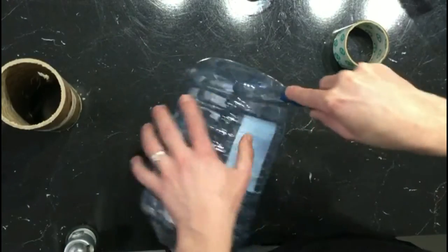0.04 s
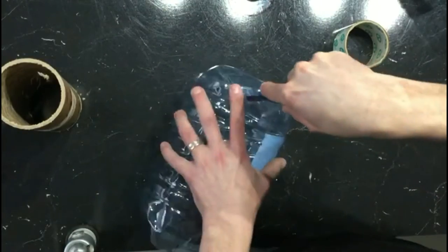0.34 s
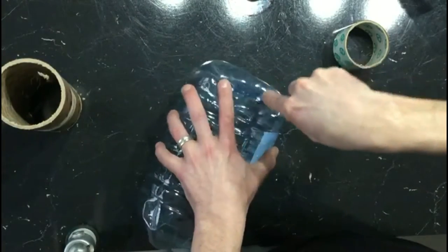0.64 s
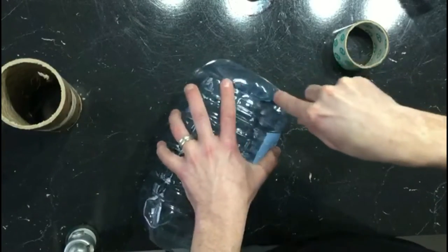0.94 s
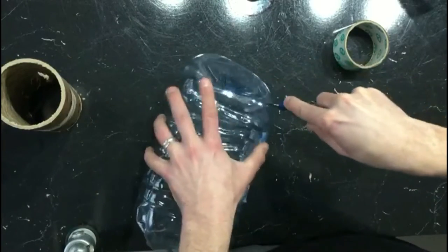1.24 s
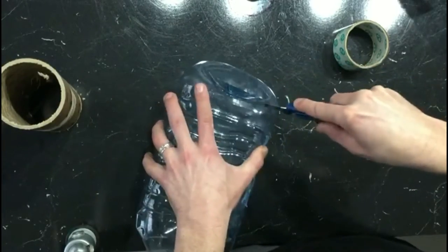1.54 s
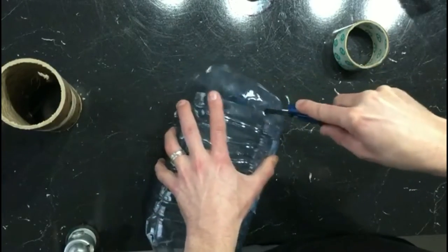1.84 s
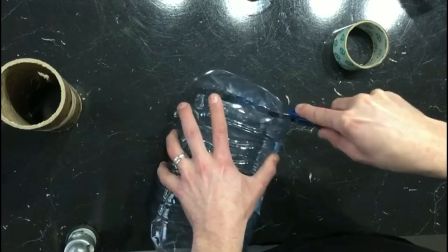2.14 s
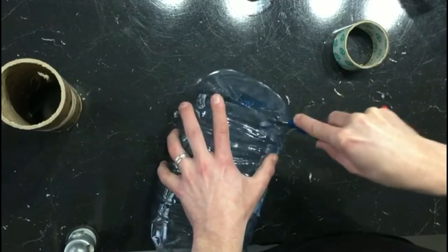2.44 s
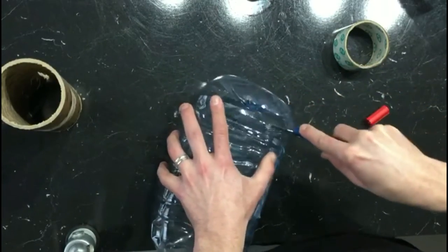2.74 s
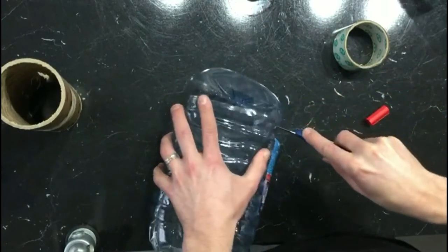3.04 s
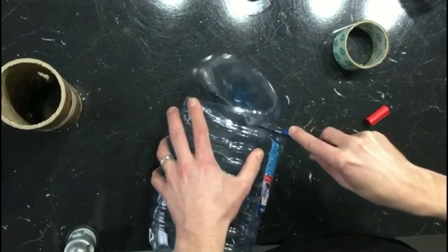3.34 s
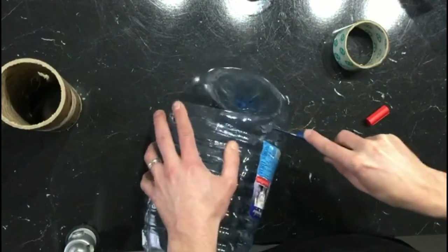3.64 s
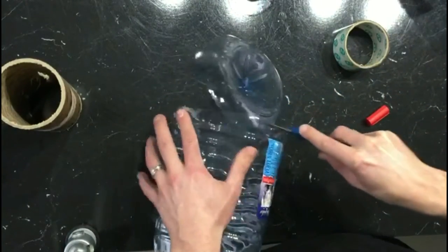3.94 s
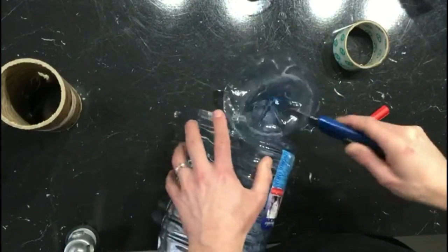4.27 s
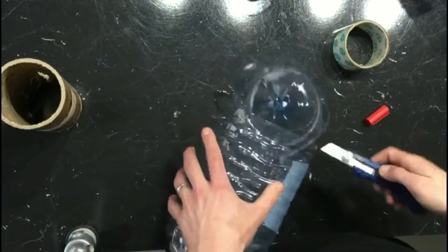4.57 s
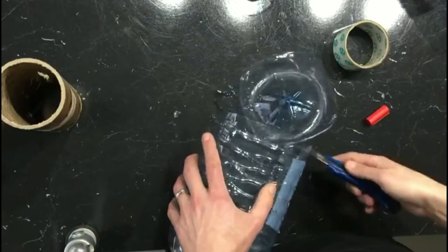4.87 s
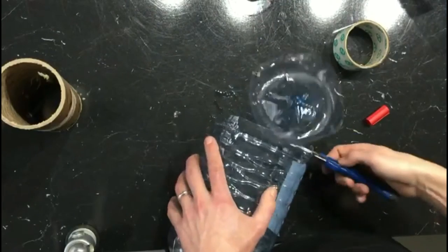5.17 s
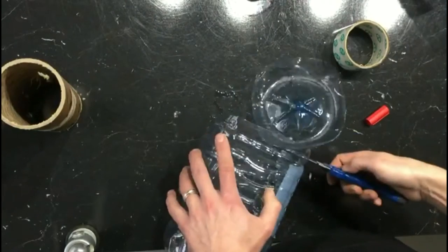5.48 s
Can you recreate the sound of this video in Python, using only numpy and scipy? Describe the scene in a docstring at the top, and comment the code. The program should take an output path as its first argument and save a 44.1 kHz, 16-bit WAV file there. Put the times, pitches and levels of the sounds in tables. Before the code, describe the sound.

A thin plastic bottle crinkles and pops as a utility knife cuts it in short rasping strokes, over a faint hum.

```python
"""Cutting open a plastic bottle

A thin plastic water bottle is held on a table and cut open with a utility knife.
The blade sticks and slips in short rasping strokes and squeaks twice. The wall crinkles under
the hand and buckles in sharp pops, and big flexes leave the bottle ringing like a drum.
A bare room echoes the rasps, crinkles, pops and squeaks, over a faint hum."""
import sys
import numpy as np
from scipy import signal
from scipy.fft import rfft, irfft, next_fast_len
from scipy.io import wavfile
from scipy.ndimage import map_coordinates

SR = 44100
rng = np.random.default_rng(int(sys.argv[2]) if len(sys.argv) > 2 else 0)


def bounce(signal):
    """Save signal as a 16-bit WAV file at the path given by the first command-line argument."""
    frames = np.transpose(np.atleast_2d(signal))
    limited = np.clip(frames, -1, 1)
    pcm = np.round(limited * 32767).astype(np.int16)
    wavfile.write(sys.argv[1], SR, pcm)


N = 251811

# The blade rasps or the bottle rubs. A panel is one patch of the bottle's wall.
# (start [s], end [s], panel pitch [Hz], panel level [dB], rasp level [dB])
STROKES = [(0, 0.075, 324, -30, -35), (.11, 0.2, 262, -40.5, -61), (.266, 0.307, 395, -40, -39),
           (.447, 0.514, 356, -33.5, -39.5), (.651, 0.709, 295, -40, -33), (.736, 0.783, 324, -46, -40.5),
           (1.858, 1.91, 450, -41, -41.5), (1.901, 1.925, 396, -24.5, -32),
           (2.087, 2.222, 343, -48.5, -48.5), (2.321, 2.443, 443, -41, -47.5),
           (2.517, 2.533, 556, -52, -39), (3.401, 3.445, 382, -33, -48), (3.576, 3.673, 445, -42.5, -47.5),
           (3.79, 3.817, 370, -37, -48), (4.083, 4.19, 282, -37.5, -47), (4.375, 4.43, 380, -48, -52),
           (4.52, 4.59, 256, -44, -60), (5.168, 5.206, 410, -48.5, -45), (5.25, 5.28, 470, -29.5, -31),
           (5.487, 5.517, 423, -46.5, -55)]
# Bands in which the blade makes the wall ring (low [Hz], high [Hz])
RASP_BANDS = [(620, 1040), (1700, 2370), (2500, 4290), (5000, 9830)]
# How each of them answers; pressing harder sounds brighter
# (level in a medium stroke [dB], growth [dB per dB of force])
RASP_RESPONSE = [(0, 0.87), (0, 1.05), (-1, 1.1536), (-8.5, 1.07)]
# Crinkling under the gripping hand (time [s], level [dB])
GRIP_LEVELS = [(0, -55), (.2, -35.5), (.5, -35.5), (1.0, -39), (1.2, -35), (1.65, -52), (1.85, -32),
               (2.1, -42), (2.4, -37), (2.7, -43), (2.95, -34), (3.3, -46), (3.75, -45), (3.95, -43.5),
               (4.5, -64.5), (5.1, -56), (5.3, -40), (5.7, -54)]
# Tone of the crinkling (frequency [Hz], level [dB])
CRINKLE_TONE = [(100, -25.5), (220, 1), (550, 9.5), (900, -1.5), (2200, -7.5), (5000, -18), (10000, -32.5)]
# Tone of the room's air (frequency [Hz], level [dB])
AIR_TONE = [(20, -17.5), (60, -7), (150, -1.5), (300, -19), (500, -20.5), (1000, -36), (3000, -27),
            (10000, -37)]
# Notes of the hum (pitch [Hz], level [dB])
HUM_NOTES = [(145.3, -58), (403.7, -79.5)]
# The room's echo; a ring time, or t60, is the time to fade by 60 dB (frequency [Hz], ring time [s])
ECHO_TIMES = [(150, 1.59), (300, 0.5), (700, 0.86), (1800, 1.15), (4500, 0.67), (9500, 0.42)]
# Tone of the echo (frequency [Hz], level [dB])
ECHO_TONE = [(100, 5), (230, -1.5), (400, -11.5), (800, -1), (1800, -2), (4000, -2.5), (6000, -1),
             (9000, -3)]
# Resonances of the hollow bottle (pitch [Hz], width [Hz], boost [dB])
BOTTLE_RESONANCES = [(179, 17, 9), (247, 5.3, 2.5), (294, 25.3, 7), (324, 2.9, 2), (395, 65, 0),
                     (457.7, 9.6, 6), (570.6, 8.6, 4), (807, 270, -3), (968, 25, 4.5), (1340, 140, -3),
                     (1100, 11, 5.5), (1380, 40, 5.5), (1592, 33, 0.5), (1491, 15, 7), (1690, 34, 4.5),
                     (1560, 25, 1.5), (1885, 19, 5.5), (2410, 25, 0), (2800, 30, 4.5), (3100, 48, 4.5)]
# The wall buckles
# (time [s], panel pitch [Hz], thump level [dB], snap level [dB], brightness [dB per octave])
BUCKLES = [(.098, 505, -18, -24.5, -2.5), (.109, 445, -23, -43, 5), (.183, 217, -26.5, -40.5, 1),
           (.283, 455, -24, -40, 1), (0.329, 427, -26.5, -34, -2.5), (.404, 383, -30.5, -38.5, -10.5),
           (0.6132, 348, -26, -30.5, -5), (.638, 392, -17.5, -18, 3), (0.698, 308, -42, -38.5, 8.5),
           (.778, 396, -26.5, -28.5, -2), (.869, 461, -40, -28, 2.5), (.932, 366, -15, -21, 1.5),
           (1.078, 360, -26, -25.5, -1), (1.226, 610, -28.5, -35.5, 1.5), (1.382, 680, -30.5, -39, -2),
           (1.453, 404, -35, -41.5, 0), (1.7528, 484, -38, -43, 7.5), (1.79, 510, -26, -34, -6),
           (1.9339, 382, -31, -29.5, 1.5), (2.253, 470, -28.5, -34, 7.5), (2.2951, 450, -30.5, -33, 7.5),
           (2.376, 560, -42, -32.5, -6), (2.529, 332, -18, -14.5, -1.24), (2.79, 355, -25, -36.5, 0.5),
           (2.824, 347, -29, -35.5, -2.5), (2.856, 373, -33, -34, 4), (2.9017, 354, -24.5, -30, 4.5),
           (2.943, 570, -27, -34.5, 5.5), (3.068, 558, -23.5, -18, 0), (3.11, 430, -17.5, -26, 1),
           (3.262, 426, -30, -42, -7), (3.598, 390, -37.5, -35.5, 0), (3.825, 490, -22.5, -51, -6),
           (3.9555, 450, -51, -34, -0.5), (4.0099, 523, -16, -16.5, -0.5), (4.064, 393, -12, -17, -6),
           (4.955, 505, -42.5, -61.5, 3), (5.013, 558, -44, -54.5, -1), (5.165, 410, -36.5, -42, -3),
           (5.604, 500, -35.5, -47.5, 1)]
# Bands in which a pop makes the wall ring (low [Hz], high [Hz], ring time [s])
POP_BANDS = [(606, 1195, 0.066), (1413, 2286, 0.093), (2196, 4380, 0.031), (4850, 9260, 0.027)]
# How each of them answers; hard pops favour the longest ring
# (level in a medium pop [dB], growth [dB per dB of force])
POP_RESPONSE = [(-4, 1.0), (-1, 1.1283), (-2, 1.022), (-12.5, 0.9056)]
# The whole bottle rings after a big flex (time [s], pitch [Hz], ring time [s], level [dB])
DRUM_RINGS = [(0.102, 182.3, 1.5, -30), (0.107, 232, 0.68, -26.5), (.934, 293.7, 0.43, -35),
              (1.914, 293.7, 0.9, -31), (2.532, 324, .8, -34), (2.532, 2050, 0.45, -28),
              (4.068, 247, 0.77, -20), (4.068, 508, 0.86, -27.5), (4.068, 1436, 1.05, -35.5),
              (4.528, 230, 0.6, -38.5)]
# The blade slips and squeaks (time [s], start pitch [Hz], end pitch [Hz], ring time [s], level [dB])
BLADE_SQUEAKS = [(1.7903, 1110, 411, 0.025, -43), (3.597, 3870, 3060, 0.016, -15)]


def amp(db):
    """Turn decibels into a number to multiply by."""
    return 10 ** (np.asarray(db) / 20)


def normalised(x):
    """Scale x to an average power of 1."""
    return x / np.sqrt(np.mean(x ** 2) + 1e-20)


def look_up(table, hz):
    """Read between the rows of a (frequency, value) table, on a log frequency scale."""
    frequencies, values = np.transpose(table)
    return np.interp(np.log(hz + 1), np.log(frequencies + 1), values)


def add(track, start_s, x):
    """Mix x into the track from start_s on."""
    start = max(0, round(start_s * SR))
    track[start:start + len(x)] += x[:max(0, N - start)]


def filtered(x, gain):
    """Multiply each frequency in x by gain(hz)."""
    size = next_fast_len(len(x) + 8192)
    return irfft(rfft(x, size) * gain(np.fft.rfftfreq(size, 1 / SR)), size)[:len(x)]


def wobble(t, per_second, points=64):
    """A smooth curve through random values."""
    return map_coordinates(rng.standard_normal(points), [t * per_second], mode="mirror")


def resonate(drive, low_hz, high_hz):
    """The drive makes the wall ring between two frequencies; the result has energy 1."""
    b, a = signal.butter(2, [low_hz, high_hz], "band", fs=SR)
    ring = signal.lfilter(b, a, drive)
    return ring / np.linalg.norm(ring)


def clicks(size, per_second, spread_db):
    """Tiny clicks of uneven strength at random moments."""
    happens = rng.random(size) < per_second / SR
    return happens * rng.choice([-1, 1], size) * amp(spread_db * np.clip(rng.standard_normal(size), -2, 2))


def blade_scrapes(panel_width=1.57, medium_db=-40.5, release_s=0.0087):
    """Each stroke is a run of tiny slips, which come in clumps as the blade catches and frees itself."""
    out, t = np.zeros(N), np.arange(SR // 4) / SR
    for start, end, panel_hz, panel_db, rasp_db in STROKES:
        length = end - start
        force_db = rasp_db - medium_db
        catching = amp(3 * wobble(t, per_second=220))
        lean_in = 1 - 0.11 * np.exp(-t / (0.21 * length))  # slower in longer strokes
        pressure = lean_in * np.exp(-np.maximum(t - length, 0) / release_s) * catching
        slips = clicks(len(t), per_second=900, spread_db=5)
        rubbing = 0.21 * rng.standard_normal(len(t))
        drive = pressure * (slips + rubbing)
        rasp = amp(panel_db) * resonate(drive, panel_hz / panel_width, panel_hz * panel_width)
        for k, ((db, growth), band) in enumerate(zip(RASP_RESPONSE, RASP_BANDS)):
            rasp -= (-1) ** k * amp(medium_db + db + growth * force_db) * resonate(drive, *band)
        rasp *= np.sqrt(length * SR)  # longer strokes carry more energy
        add(out, start, amp(0.5) * rasp)
        add(out, start, room_echo(rasp))
    return out


def grip_crinkle():
    """The gripped wall keeps crinkling softly in many tiny creases."""
    grip = amp(np.interp(np.arange(N) / SR, *np.transpose(GRIP_LEVELS)))
    creases = clicks(N, per_second=800, spread_db=4)
    ticks = grip * normalised(filtered(creases, lambda hz: amp(look_up(CRINKLE_TONE, hz))))
    return amp(-3) * ticks + amp(-2) * room_echo(ticks)[:N]


def air_and_hum(air_db=-60, waver_db=-0.5):
    """Steady room air and a faint hum that wavers a little."""
    t = np.arange(N) / SR
    air = normalised(filtered(rng.standard_normal(N), lambda hz: amp(look_up(AIR_TONE, hz))))
    hum = sum(amp(db) * np.sqrt(2) * np.sin(2 * np.pi * hz * t) for hz, db in HUM_NOTES)
    return amp(air_db) * air + hum * amp(waver_db * wobble(t, per_second=6))


def room_echo(x, gap_s=0.0049, build_s=0.00067):
    """A wash of echoes starts after the first bounce off a wall and loses its treble first."""
    hz, t, noise = signal.stft(rng.standard_normal(round(1.2 * SR)), SR, nperseg=256)
    t60 = look_up(ECHO_TIMES, hz)[:, None]
    fade = amp(look_up(ECHO_TONE, hz)[:, None] - 60 * t / t60)
    even_energy = np.sqrt(2 * np.log(1000) / (t60 * SR))  # ringing longer adds no energy
    tail = signal.istft(noise * fade * even_energy, SR, nperseg=256)[1]
    age = np.maximum(np.arange(len(tail)) / SR - gap_s, 0)
    return signal.fftconvolve(x, tail * (1 - np.exp(-age / build_s)))


def hollow_bottle(x):
    """The hollow bottle's resonances boost some pitches in the wall's sounds and soften a few."""
    def gain(f):
        return 1 + sum((amp(db) - 1) * 1j * f * width / (hz * hz - f * f + 1j * f * width)
                       for hz, width, db in BOTTLE_RESONANCES)
    return amp(-1) * filtered(x, gain)


def wall_pops(panel_t60=0.068, panel_width=1.285, medium_db=-27, pivot_hz=1970, rise_s=0.0003):
    """A panel flips over with one low thump, and its crease snaps the whole wall into a short ring."""
    out, t = np.zeros(N), np.arange(SR // 10) / SR
    kick = 1. * (t == 0)
    scale = np.sqrt(SR / 100)  # the energy of 10 ms of sound at power 1
    octaves = np.log2([np.sqrt(low_hz * high_hz) / pivot_hz for low_hz, high_hz, _ in POP_BANDS])
    band_db, growth = np.transpose(POP_RESPONSE)
    for start, panel_hz, thump_db, snap_db, brightness in BUCKLES:
        force_db = snap_db - medium_db
        bands = [(panel_hz / panel_width, panel_hz * panel_width, panel_t60), *POP_BANDS]
        levels_db = [thump_db, *(medium_db + band_db + growth * force_db + brightness * octaves)]
        snap, crumple = np.zeros((2, len(t)))
        for k, (db, (low_hz, high_hz, t60)) in enumerate(zip(levels_db, bands)):
            swing = (-1) ** k  # neighbouring bands swing opposite ways
            snap += swing * amp(db) * resonate(kick, low_hz, high_hz)
            creasing = rng.standard_normal(len(t)) * amp(-60 * t / t60) * (1 - np.exp(-t / rise_s))
            crumple += amp(db) * resonate(creasing, low_hz, high_hz)
        clean = np.clip(0.4 + 0.008 * force_db, 0, 1)  # harder pops snap more and crumple less
        direct = amp(-2) * np.sqrt(clean) * bending_waves(snap) + np.sqrt(1 - clean) * crumple
        add(out, start, scale * direct)
        add(out, start, scale * amp(-0.92) * room_echo(snap))
    return out


def bending_waves(x, delay_at_1khz_s=0.001184):
    """Ripples run through the plastic: the lower their pitch, the later they arrive."""
    return filtered(x, lambda hz: np.exp(-4j * np.pi * delay_at_1khz_s * np.sqrt(1000 * hz)))


def drum_rings(swell_s=0.012, waver_db=3.0):
    """A big flex rings the whole bottle like a drum: each note swells, then wavers as it fades."""
    out, t = np.zeros(N), np.arange(SR) / SR
    for start, hz, t60, db in DRUM_RINGS:
        waver = waver_db * wobble(t, per_second=20, points=24)
        loudness = amp(db - 60 * t / t60 + waver) * (1 - np.exp(-t / swell_s))
        add(out, start, loudness * np.sin(2 * np.pi * hz * t))
    return out


def blade_squeaks(glide_s=0.0021, rise_s=0.0023):
    """The blade slips with a short squeak, whose pitch drops as the strained plastic relaxes."""
    out, t = np.zeros(N), np.arange(SR // 10) / SR
    for start, start_hz, end_hz, t60, db in BLADE_SQUEAKS:
        hz = end_hz + (start_hz - end_hz) * np.exp(-t / glide_s)
        loudness = amp(db - 60 * t / t60) * (1 - np.exp(-t / rise_s))
        squeak = loudness * np.sin(2 * np.pi * np.cumsum(hz) / SR)
        add(out, start, squeak)
        add(out, start, amp(-4) * room_echo(squeak))
    return out


def scene():
    """Bottle, knife and room, mixed into one channel."""
    wall = wall_pops() + blade_scrapes() + blade_squeaks() + grip_crinkle()
    return (hollow_bottle(wall) + drum_rings() + air_and_hum())[None]


def record(dry, ceiling=0.85, top_hz=10400):
    """The microphone rounds off the loudest snaps and cuts away the highest treble."""
    rounded = dry[0] / (1 + np.abs(dry[0] / ceiling) ** 4) ** (1 / 4)
    return filtered(rounded, lambda hz: 1 / np.sqrt(1 + (hz / top_hz) ** 120))[None]


dry = scene()
out = record(dry)
bounce(out)
```